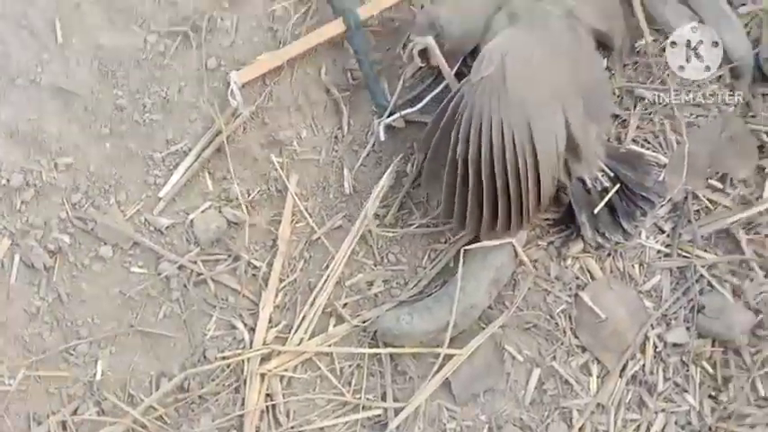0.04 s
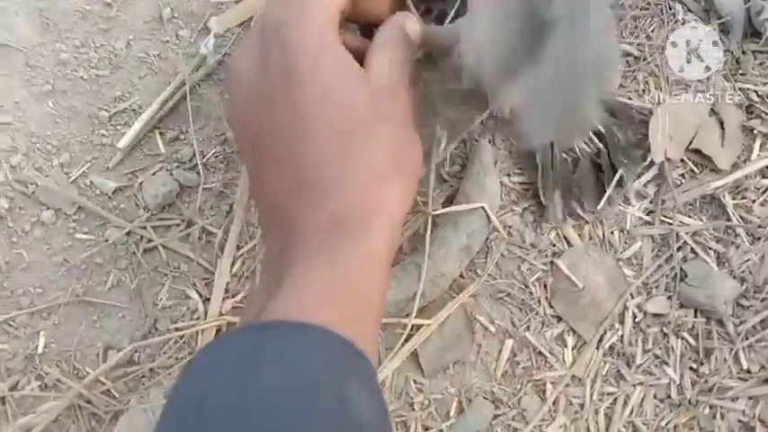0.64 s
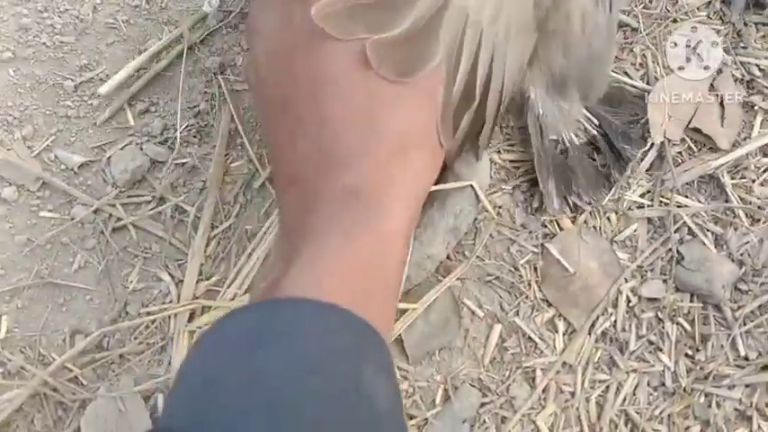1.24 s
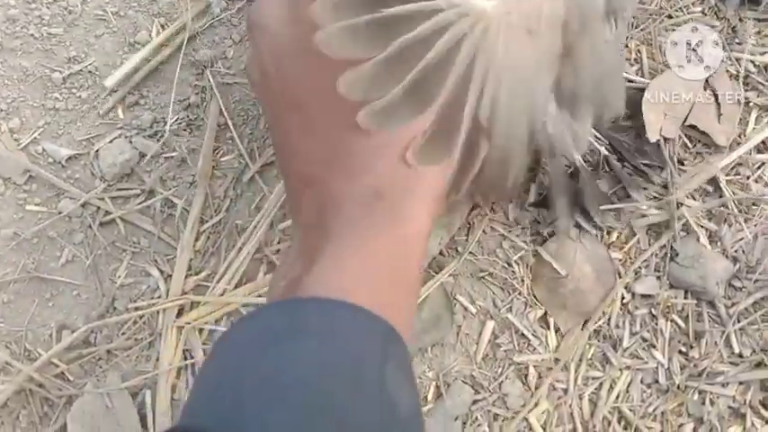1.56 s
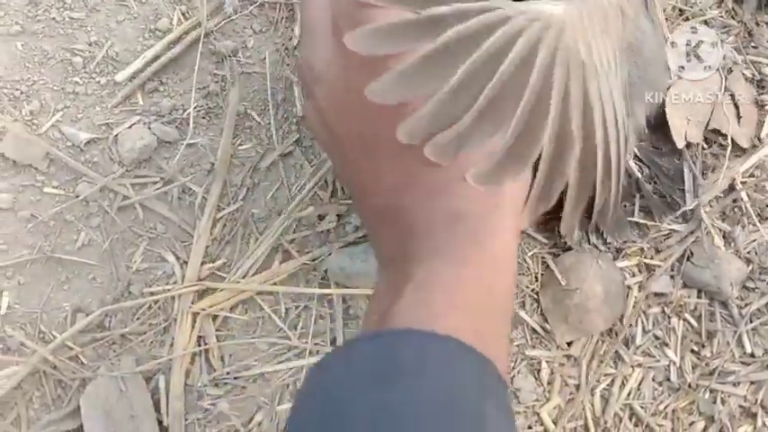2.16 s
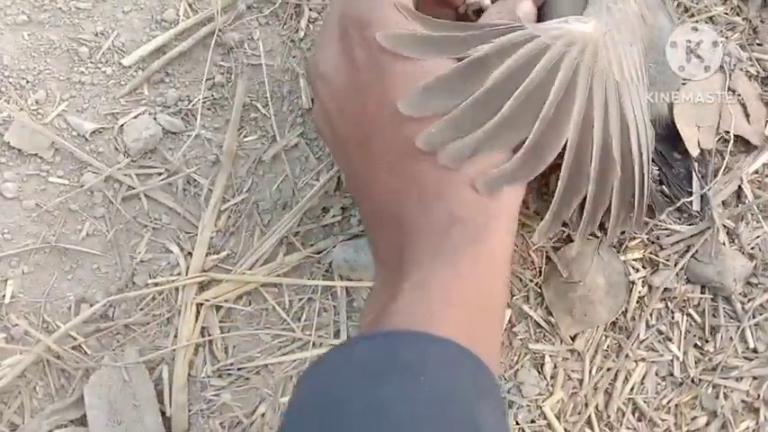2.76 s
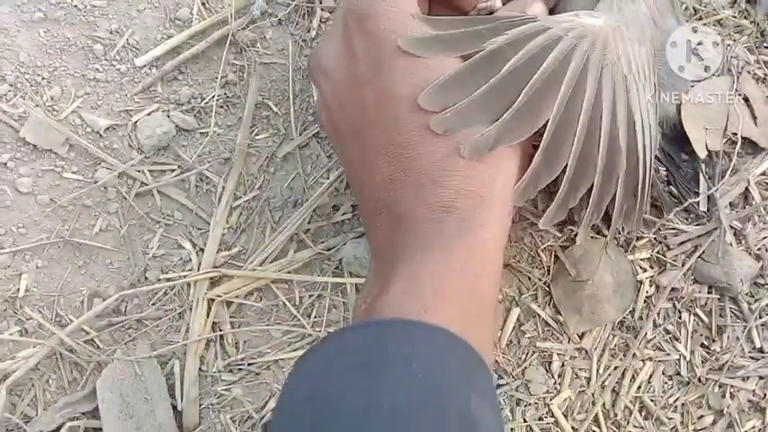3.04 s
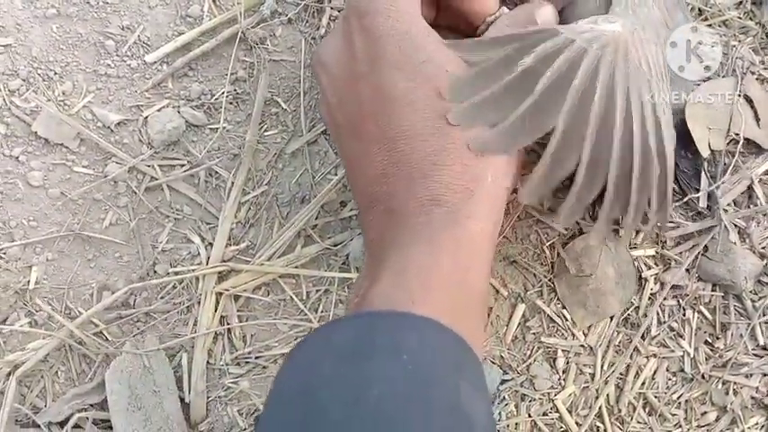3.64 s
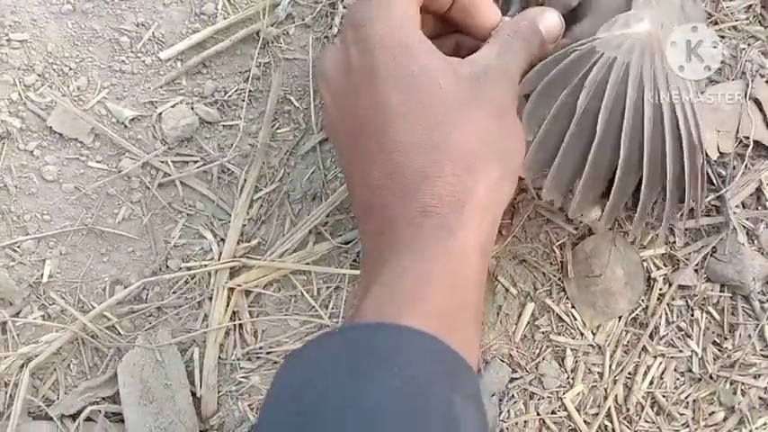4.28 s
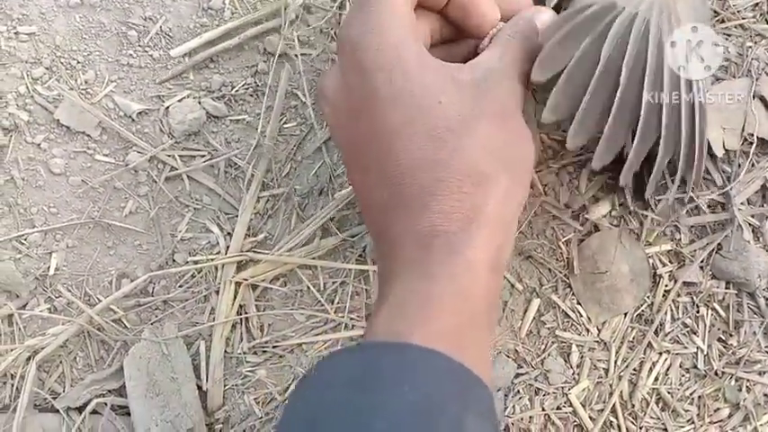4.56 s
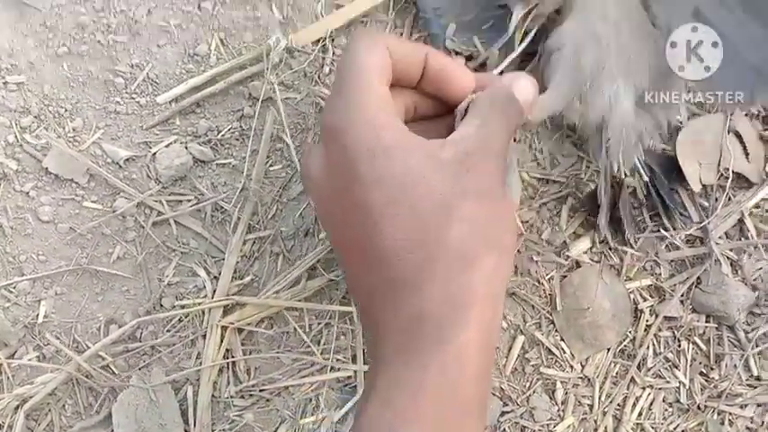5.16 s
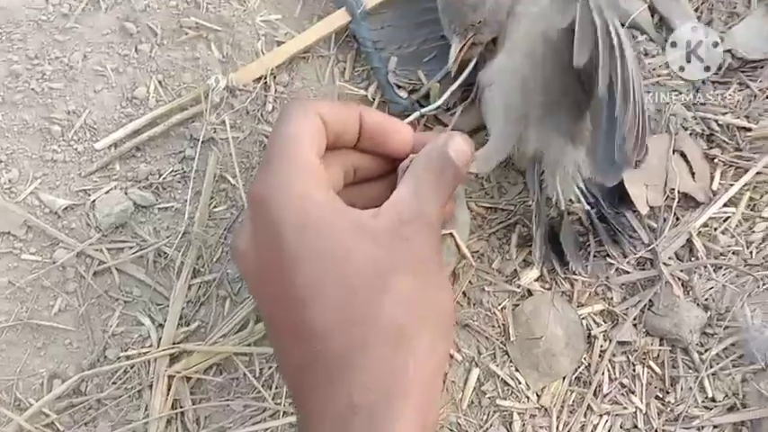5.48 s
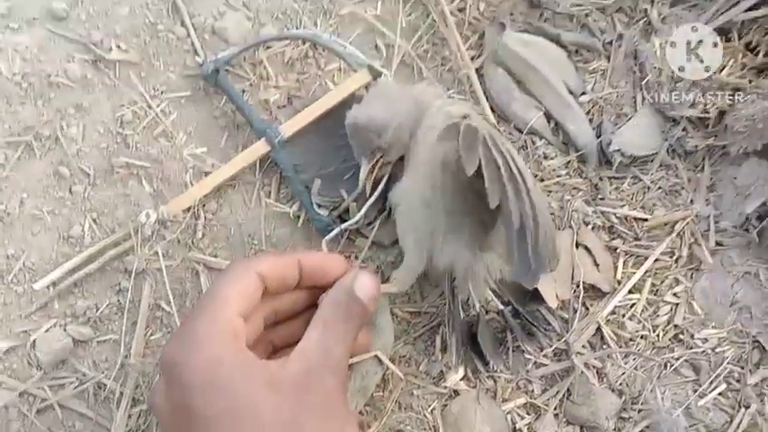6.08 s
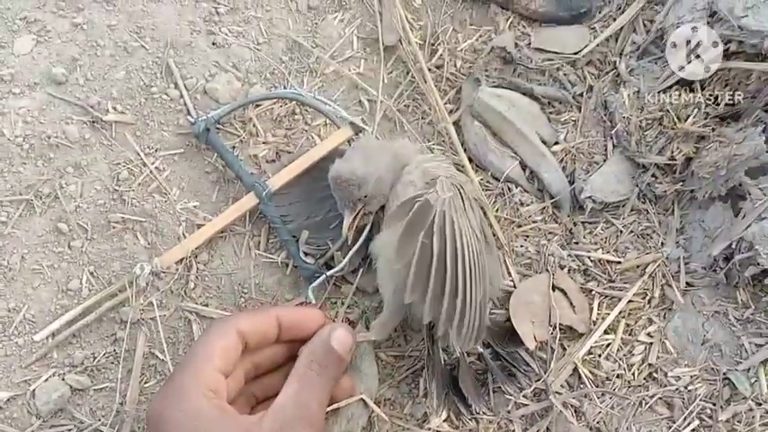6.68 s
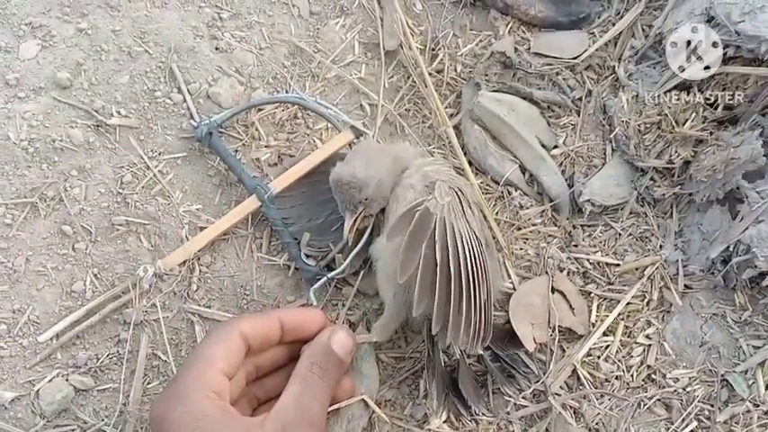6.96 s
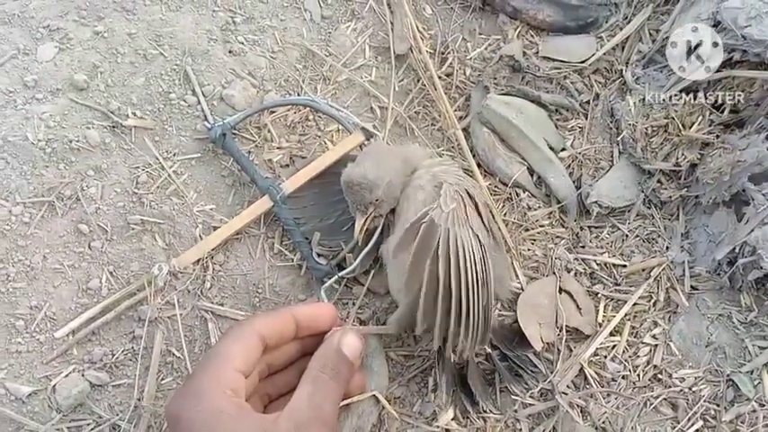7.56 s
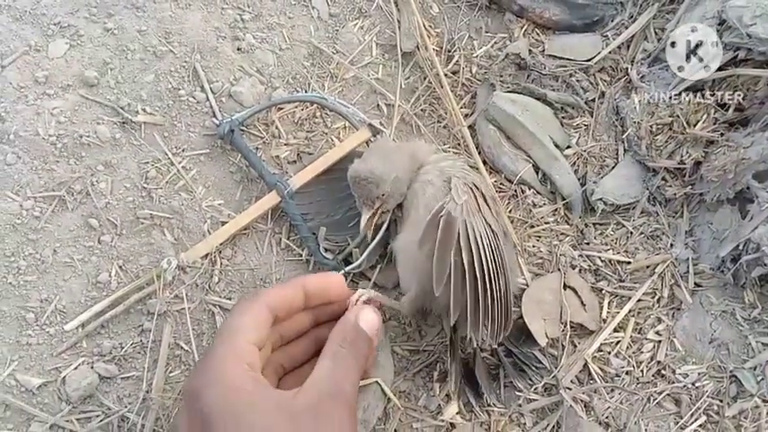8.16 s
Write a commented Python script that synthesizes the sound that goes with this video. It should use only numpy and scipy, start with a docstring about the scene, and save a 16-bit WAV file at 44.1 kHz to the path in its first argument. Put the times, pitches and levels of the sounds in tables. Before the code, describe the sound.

Harsh bird squawks repeat about twice a second at close range outdoors, turning more piercing halfway, with soft early wing rustles.

```python
"""Shrill, rasping squawks, nineteen in a row and very close: a snared bird screams as a hand works at its leg.
Membranes in its syrinx chop the breath into pulses, which the throat and open beak filter by resonance.
Each squawk falls from about 2 kHz with a fast flutter, holds a clearer note and drops as the air runs out.
Halfway the bird rights itself and its voice turns more piercing. Early on, wings rustle dry straw and
thump softly on the ground; behind it all lies the faint air of an open field."""
import sys
import numpy as np
from scipy import signal
from scipy.fft import next_fast_len
from scipy.io import wavfile
from scipy.ndimage import uniform_filter1d

SR = 44100
rng = np.random.default_rng(int(sys.argv[2]) if len(sys.argv) > 2 else 0)


def file_out(sig):
    """Save sig as 16-bit WAV at sys.argv[1]."""
    # one column per channel
    cols = np.atleast_2d(sig).T
    # limit, then scale
    lim = np.clip(cols, -1, 1)
    pcm = np.round(lim * 32767).astype(np.int16)
    wavfile.write(sys.argv[1], SR, pcm)


N = 371322
TIME_S = np.arange(N) / SR


# the bird's posture: time_s, upright_share (0 pinned, 1 upright)
POSTURE_CURVE = [(0, 0.019), (4.2, .08), (4.35, 0.61), (4.48, 0.39), (4.56, 1), (5.8, 1)]
def bird(quaver=.006, quaver_hz=45, pinned_strain=.84, beak_hz_per_lift=1800):
    """Source-filter principle: one syrinx drives the low throat resonances and the shrill beak ring."""
    pitch_hz, beak_db, throat_db, beak_hz = gestures()
    upright = np.clip(np.interp(TIME_S, *np.transpose(POSTURE_CURVE)), 0, 1)
    beak_carry_db, throat_carry_db, carry_shift_hz = radiation(pitch_hz, upright)
    turn_db, turn_shift_hz = head_turns()
    lift = catches()  # a catch is higher, louder and clearer
    beak_db = beak_db + beak_carry_db + turn_db + 28 * lift
    throat_db = throat_db + throat_carry_db + 45 * lift
    beak_hz = beak_hz + carry_shift_hz + turn_shift_hz + beak_hz_per_lift * lift
    strain = blend(pinned_strain, 1, upright) * amp(-35 * lift)
    source = syrinx(pitch_hz * (1 + lift + quaver * wander(quaver_hz)), strain)
    low_tone = amp(throat_db) * throat(source, upright)
    shrill_ring = amp(beak_db) * beak(source, upright, beak_hz, pitch_hz)
    return airflow() * (low_tone + shrill_ring)


# one squawk a row, before posture and catches act on it: start_s, end_s, top_hz, fall_s, held_hz,
# sag_hz_per_s, beak_db, push_db, throat_db, swell_db_per_s, beak_opening_hz, beak_held_hz
SQUAWK_GESTURES = [ (.056, .366, 2013, 0.089, 897.5, 387.5, -17.5, 1, -30.5, 3, 5160, 5380),
                   (.453, 0.891, 2120, 0.06, 1112, 759.5, -15.5, -0.5, -31.5, 14.5, 5770, 5120),
                   (0.974, 1.348, 1838, 0.059, 1003, 773, -19, 1, -32, 15.5, 5750, 5240),
                   (1.434, 1.841, 1828, .09, 1022, 259, -16.5, 0, -30, -8.5, 5600, 4790),
                   (1.937, 2.325, 1910, 0.065, 1047, 567.5, -16, 6.5, -30, 0, 5430, 4860),
                   (2.416, 2.78, 1885, 0.072, 1067, 610.5, -16.5, 3, -32.5, 10, 5560, 4990),
                   (2.859, 3.221, 1900, 0.067, 1052, 782.5, -18, 7.5, -32, 12, 5400, 4890),
                   (3.313, 3.686, 1960, 0.062, 1059, 891, -16, 5, -30.5, 6, 5620, 4940),
                   (3.774, 4.208, 1960, 0.067, 1080, 341, -17.5, -5.5, -30.5, 10, 5460, 4800),
                   (4.300, 4.662, 1834, 0.051, 1062, 846, -22.5, -5.5, -27, -2.5, 5100, 5380),
                   (4.747, 5.122, 1923, 0.052, 1017, 359.5, -22.5, -3.5, -29, 5, 5230, 5130),
                   (5.209, 5.552, 1853, 0.061, 995, 350, -23.5, 1.2, -26.5, 13.5, 4870, 4660),
                   (5.651, 6.016, 2001, .068, 1002, -185, -21.5, -1.5, -30.5, -11, 4070, 4930),
                   (6.098, 6.417, 1918, .06, 993.5, 126, -20.5, -4, -31.5, -11.5, 4720, 5080),
                   (6.501, 6.801, 1942, .065, 967.5, 212, -21, 2, -28.5, 4.5, 4586, 4845),
                   (6.885, 7.249, 1930, 0.059, 956.4, 282, -22, -1, -29, 2.5, 4680, 4853),
                   (7.341, 7.616, 1947, 0.077, 984.4, -290, -21.5, 1, -29, 8, 4360, 4810),
                   (7.699, 8.024, 1972, 0.069, 932.6, 261, -21.5, 0.5, -26.5, 19.5, 4468, 4830),
                   (8.125, 8.440, 2028, 0.078, 1015, -110, -20, -1.5, -32.5, -7.5, 4240, 5020), ]
def gestures():
    """Articulation: the squawks join into slow curves of pitch_hz, beak_db, throat_db and beak_hz."""
    times, controls = [], []
    for start, end, *shape in SQUAWK_GESTURES:
        since = np.linspace(0, end - start, 400)
        times.append(start + since)
        controls.append(squawk(since, end - start, *shape))
    return [np.interp(TIME_S, np.concatenate(times), curve) for curve in np.hstack(controls)]


def squawk(t, length_s, top_hz, fall_s, held_hz, sag_hz_per_s, beak_db, push_db, throat_db,
           swell_db_per_s, beak_opening_hz, beak_held_hz, held_at_s=.25, collapse_s=.016):
    """Pitch follows membrane tension, which lets go, holds, then collapses as the air runs out."""
    left_s = np.maximum(length_s - t, 0)
    held = held_hz - sag_hz_per_s * (t - held_at_s)
    fall = (top_hz - held[0]) * np.exp(-(t / fall_s) ** 1.5)
    collapse = 1 - .37 * np.exp(-(left_s / collapse_s) ** 1.3)
    last_push_db = push_db * bump(left_s, middle_s=.041, half_s=.016)
    swell_db = swell_db_per_s * (t - held_at_s)
    beak_hz = beak_held_hz + (beak_opening_hz - beak_held_hz) * bump(t, 0, half_s=.025)
    return (held + fall) * collapse, beak_db + last_push_db, throat_db + swell_db, beak_hz


def airflow(attack_s=.016, release_s=.014, lead_s=.00056, lag_s=.0041):
    """Amplitude envelope: the breath opens quickly for each squawk and closes softly at its end."""
    flow = np.zeros(N)
    for start, end, *_ in SQUAWK_GESTURES:
        opening = np.clip((TIME_S - start + lead_s) / attack_s, 0, 1)
        closing = np.clip((end + lag_s - TIME_S) / release_s, 0, 1)
        flow += opening * np.sin(np.pi / 2 * closing) ** 2
    return flow


# roughness of the membranes at each pitch: pitch_hz, flutter_share, slips_per_s
ROUGHNESS = [(680, .7, 250), (880, .17, 0), (1030, .18, 0), (1100, .33, 10), (1150, .43, 100),
             (1250, .62, 60), (1550, .95, 10), (2000, .3, 0)]
def syrinx(pitch_hz, strain, flutter_hz=200, swing=.1, throb=.29, slip_rad=.49, slip_loss=.19):
    """Modulation: a slower flutter shakes the membrane pulses in pitch and level, heard as a rasp."""
    rasp, slips_per_s = look_up(pitch_hz, ROUGHNESS)
    beat = 2 * np.pi * np.cumsum(flutter_hz * (1 + .05 * wander(25))) / SR
    flutter = strain * rasp * (np.sin(beat) + .4 * np.sin(beat / 2))  # alternate beats are stronger
    slip_onsets = rng.random(N) < slips_per_s / SR
    slip = np.minimum(np.convolve(slip_onsets, np.hanning(110), "same"), 1)
    hz = pitch_hz * (1 + swing * flutter + .012 * wander(86) + .006 * wander(480))
    phase = 2 * np.pi * np.cumsum(hz) / SR - slip_rad * slip  # a slipped pulse comes late
    pulses = unit_rms(sum(np.cos(k * phase) * (k * hz < SR / 2) for k in range(1, 21)))
    puffs = .0075 * (1 + np.cos(phase)) * rng.standard_normal(N)  # air escapes once a cycle
    voice = (pulses + puffs) * (1 + throb * flutter) * (1 - slip_loss * slip)
    return high_pass(voice, .72 * pitch_hz)


# catches in the voice: time_s, half_length_s, pitch_lift_share
VOICE_CATCHES = [(0.617, 0.02, 0.17), (1.267, .007, 0.044), (3.96, .006, .08), (3.998, .006, .08),
                 (4.038, .006, .08), (4.06, .011, .18), (4.092, .006, .12), (4.107, .006, .09),
                 (4.44, .014, 0.038), (4.503, 0.009, 0.081)]
def catches():
    """Register break: the pitch lifts briefly into a higher, throatier voice."""
    return sum(share * bump(TIME_S, s, half_s) for s, half_s, share in VOICE_CATCHES)


# how each pitch carries: pitch_hz, beak_pinned_db, beak_upright_db, throat_pinned_db,
# throat_upright_db, pinned_beak_shift_hz
CARRY_BY_PITCH = [ (726, -9.5, -.5, -2.5, -7.5, -100), (920, -.7, 8, 2.5, -4.5, -250),
                  (1000, -2.9, 9.4, 7.8, -7.2, -50), (1090, -4.3, 5.5, 1.5, -8.7, 280),
                  (1245, -4, .4, 5.8, 1.8, -80), (1460, -4.5, -.4, 3, -3.4, -150),
                  (1640, -2.7, -.8, -3.5, -8.5, -50), (2010, -16.5, -8.5, 0, -10.5, 0), ]
def radiation(pitch_hz, upright):
    """Radiation depends on pitch and posture: gives beak gain, throat gain and beak resonance shift."""
    beak_pinned, beak_up, throat_pinned, throat_up, shift_hz = look_up(pitch_hz, CARRY_BY_PITCH)
    beak_db = blend(beak_pinned, beak_up, upright)
    throat_db = blend(throat_pinned, throat_up, upright)
    return beak_db, throat_db, (1 - upright) * shift_hz


# throat response in each posture: frequency_hz, gain_db
PINNED_THROAT = [(400, -42.5), (700, -13), (900, -5), (1080, -13), (1220, 0), (1400, 0), (1650, -19.5),
                 (1800, -3), (2000, 2), (2220, -12.5), (2600, -7), (3000, -14.5), (3600, -12), (4600, -54)]
UPRIGHT_THROAT = [(400, -42), (700, -13), (930, -5.5), (1050, -15.5), (1160, -8), (1280, 1.5), (1450, -6),
                  (1700, -11.5), (1900, -1), (2100, -15.5), (2600, 0.5), (2950, -5.5), (3600, -11.5),
                  (4600, -50)]
def throat(source, upright):
    """Formants: the throat's resonances favour the low harmonics, differently in each posture."""
    tone = blend(colour(source, PINNED_THROAT), colour(source, UPRIGHT_THROAT), upright)
    return steadied(tone, band_hz=(550, 2600))


# beak response in each posture: frequency_hz, gain_db
PINNED_BEAK = [(1800, -49.5), (2900, -17.5), (3500, 6), (4000, -0.5), (4400, 4.5), (4900, 7.5), (5450, 4),
               (6000, -2), (7000, -18), (8200, -25.5), (10000, -42), (12500, -12), (14800, -5.5)]
UPRIGHT_BEAK = [(1800, -39.5), (2900, -31.5), (3400, -4.5), (4000, 3), (4500, 0.5), (5100, 5.5),
                (5600, 1.5), (6050, 1), (6500, -9.5), (7400, -34.5), (10000, -54), (11700, -35.5),
                (13000, -16.5), (14800, -10)]
def beak(source, upright, beak_hz, pitch_hz, grit=.17, shimmer_db=.8):
    """Cavity resonance: the open beak picks out a moving band of high harmonics, a trembling ring."""
    drive = source * (1 + grit * wander(400))  # the membranes close unevenly hard
    ring = resonate(drive, beak_hz, width_hz=740)
    ring = blend(colour(ring, PINNED_BEAK), colour(ring, UPRIGHT_BEAK), upright)
    ring = steadied(ring, band_hz=(3400, 8000))
    return sizzle(ring, pitch_hz) * amp(shimmer_db * wander(110))


# jerks of the head: time_s, half_length_s, beak_gain_db, resonance_shift_hz
HEAD_JERKS = [(4.11, 0.029, -8, -600), (4.401, 0.076, -5, -1500), (5.712, 0.16, -3.5, -450)]
def head_turns():
    """Off-axis loss: as the head jerks aside, the beak ring weakens and dulls."""
    gain_db = sum(db * bump(TIME_S, s, half_s) for s, half_s, db, _ in HEAD_JERKS)
    shift_hz = sum(hz * bump(TIME_S, s, half_s) for s, half_s, _, hz in HEAD_JERKS)
    return gain_db, shift_hz


# treble sent forward by the beak, for a 1 kHz note: time_s, gain_db
BEAK_AIM = [(.7, -2), (1.152, 6), (2.6, 2.5), (3.6, -6), (4.5, 13), (5.4, 14), (6.2, 1)]
def sizzle(ring, pitch_hz, db_per_octave=3):
    """Directivity: the highest overtones follow the aim of the beak; they also swell as the note falls."""
    treble = signal.sosfiltfilt(signal.butter(4, 7500, "high", fs=SR, output="sos"), ring)
    octaves = np.log2(pitch_hz / 1000)
    aim_db = np.interp(TIME_S, *np.transpose(BEAK_AIM))
    return ring + treble * (amp(aim_db - db_per_octave * octaves) - 1)


# wing and hand brushing the straw: middle_s, length_s, level_db
STRAW_STROKES = [(0.037, 0.07, -57.5), (0.318, 0.6, -48), (0.648, 0.088, -40.5), (1.444, 0.56, -52.5),
                 (1.676, 0.074, -43.5)]
# spectrum of dry straw: frequency_hz, gain_db
STRAW_SPECTRUM = [(100, -36.5), (450, -15.5), (800, -10), (1300, -2), (1700, -13), (2200, -7), (3200, -8),
                  (5000, 2), (6500, -13.5), (9000, -20.5), (12500, -11.5), (15000, -7)]
def straw(snaps_per_s=1500, spread_db=4, swish=.89):
    """Friction and fracture: feathers swish as noise and stalks snap as random impulses."""
    sizes = amp(spread_db * np.minimum(rng.exponential(1, N), 4))
    snaps = sizes * rng.choice([-1, 1], N) * (rng.random(N) < snaps_per_s / SR)
    grain = unit_rms(colour(unit_rms(snaps) + swish * rng.standard_normal(N), STRAW_SPECTRUM))
    strokes = np.zeros(N)
    for middle_s, length_s, db in STRAW_STROKES:
        add(strokes, middle_s - length_s / 2, amp(db) * np.hanning(int(length_s * SR)))
    return grain * strokes


# the wing meeting the ground: start_s, pitch_hz, level_db
WING_THUMPS = [(.635, 239, -53.5), (1.67, 119.6, -60.5)]
def thumps(rise_s=.01):
    """Damped oscillation: a wing pushing on the soil gives a few soft, low cycles."""
    t, out = np.arange(SR // 4) / SR, np.zeros(N)
    envelope = t / rise_s * np.exp(1 - t / rise_s)
    for start_s, hz, db in WING_THUMPS:
        add(out, start_s, amp(db) * envelope * np.sin(2 * np.pi * hz * t))
    return out


def field(x, near_db=-18, near_t60_s=.036, far_db=-50, far_t60_s=.28):
    """Scattering: ground and hand return quick reflections, then a very faint open-air tail dies away."""
    t, echo = np.arange(SR // 2) / SR, 0
    for db, t60_s in (near_db, near_t60_s), (far_db, far_t60_s):
        tail = rng.standard_normal(len(t)) * amp(-60 * t / t60_s) * (t > .001)
        echo += amp(db) * tail / np.linalg.norm(tail)
    return x + signal.oaconvolve(x, echo)[:N]


# spectrum of the field's still air: frequency_hz, relative_density_db
AIR_SPECTRUM = [(20, -15.5), (70, -1), (120, -2.5), (200, -7), (400, -9.5), (1000, -14.5), (5000, -25.5),
                (15000, -42)]
def still_air(level_db=-78):
    """Ambient noise: a steady broadband hush, strongest in the bass."""
    return amp(level_db) * unit_rms(colour(rng.standard_normal(N), AIR_SPECTRUM))


def amp(db):
    """Decibels to amplitude gain."""
    return 10 ** (np.asarray(db) / 20)


def unit_rms(x):
    """Normalisation to rms 1."""
    return x / np.sqrt(np.mean(x ** 2) + 1e-20)


def add(mix, start_s, sound):
    """Superposition of a sound onto the mix."""
    part = mix[max(round(start_s * SR), 0):][:len(sound)]
    part += sound[:len(part)]


def blend(a, b, share):
    """Linear crossfade from a to b."""
    return (1 - share) * a + share * b


def look_up(x, table):
    """Linear interpolation of a table's other columns along its first."""
    axis, *columns = np.transpose(table)
    return [np.interp(x, axis, column) for column in columns]


def bump(t, middle_s, half_s):
    """Gaussian swell of height 1."""
    return np.exp(-((t - middle_s) / half_s) ** 2)


def wander(rate_hz):
    """Low-passed noise: a random drift of rms 1."""
    return unit_rms(signal.sosfilt(signal.butter(2, rate_hz, fs=SR, output="sos"), rng.standard_normal(N)))


def colour(x, outline, size=4096):
    """Minimum-phase filter with an outline of (frequency_hz, gain_db) points."""
    hz, db = np.transpose(outline)
    bin_hz = abs(np.fft.fftfreq(size, 1 / SR)) + 1
    log_gain = np.log(amp(np.interp(np.log(bin_hz), np.log(hz), db)))
    taps = np.fft.ifft(np.exp(np.conj(signal.hilbert(log_gain)))).real
    return signal.oaconvolve(x, taps[:size // 2])[:len(x)]


def resonate(x, hz, width_hz):
    """Resonance of gain 1 whose centre follows the curve hz."""
    carrier = np.exp(2j * np.pi * np.cumsum(hz) / SR)
    pole = np.exp(-np.pi * width_hz / SR)
    return 2 * (carrier * signal.lfilter([1 - pole], [1, -pole], x / carrier)).real


def high_pass(x, hz):
    """Heterodyne filter: shifts down by the curve hz, drops negative frequencies and shifts back."""
    carrier = np.exp(2j * np.pi * np.cumsum(hz) / SR)
    size = next_fast_len(N)
    shifted = np.fft.fft(signal.hilbert(x, size)[:N] / carrier, size)
    return (carrier * np.fft.ifft(shifted * (np.fft.fftfreq(size) > 0))[:N]).real


def steadied(x, band_hz, size=1100):
    """Division by running rms: holds one band's slow level at 1 and leaves the fast throb alone."""
    band = signal.sosfiltfilt(signal.butter(4, band_hz, "band", fs=SR, output="sos"), x)
    return x / np.sqrt(abs(uniform_filter1d(band ** 2, size)) + 1e-12)


def scene():
    """Identical signals at both ears place everything straight ahead."""
    mono = field(bird() + straw() + thumps()) + still_air()
    return np.array([mono, mono])


def record(dry):
    """Clipping at full scale, then a band limit at 15.5 kHz."""
    low_pass = signal.firwin(511, 15500, window=("kaiser", 9), fs=SR)
    return signal.oaconvolve(np.clip(dry, -1, 1), low_pass[None], "same", axes=1)


dry = scene()
out = record(dry)
file_out(out)
```